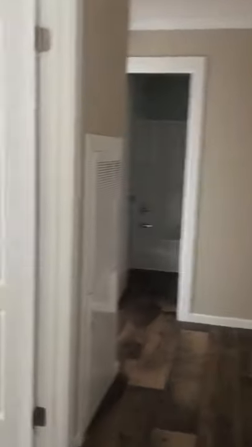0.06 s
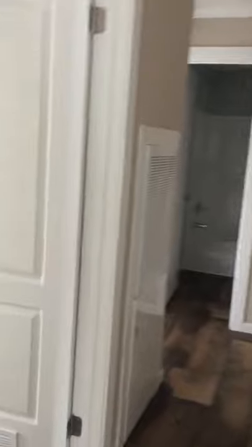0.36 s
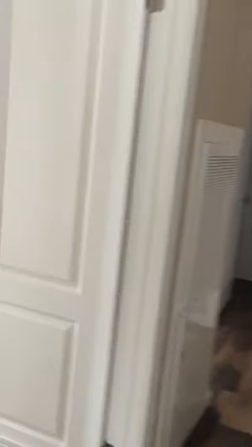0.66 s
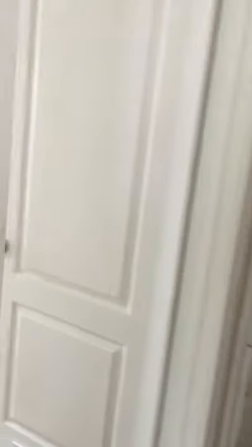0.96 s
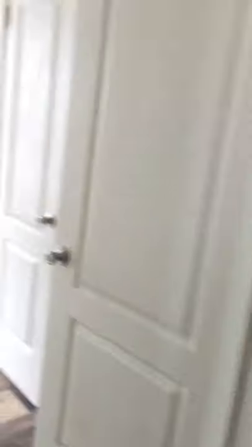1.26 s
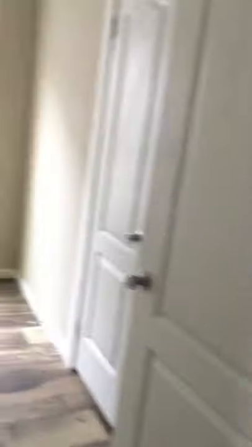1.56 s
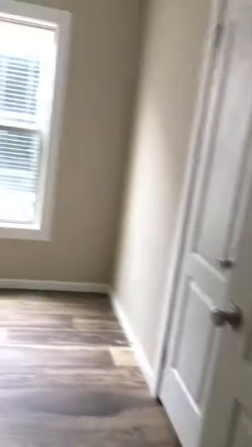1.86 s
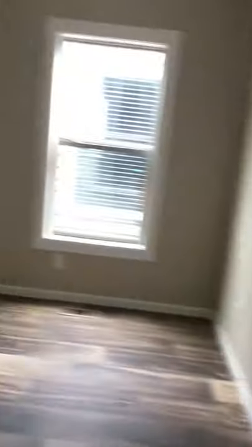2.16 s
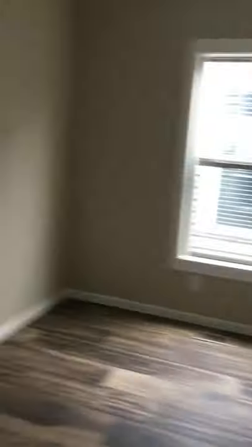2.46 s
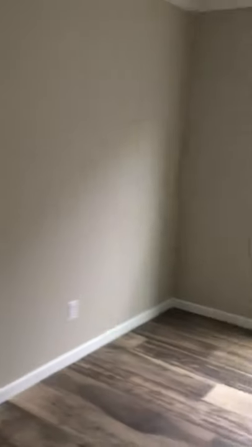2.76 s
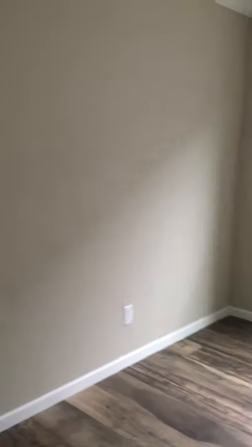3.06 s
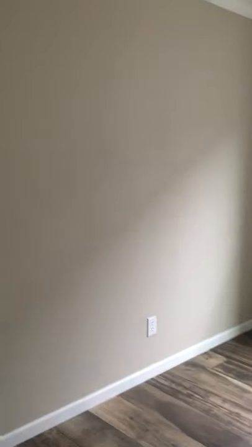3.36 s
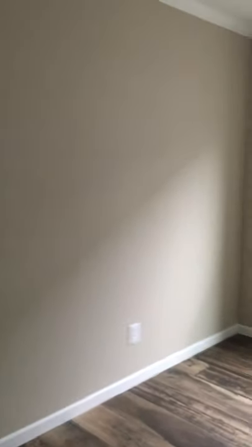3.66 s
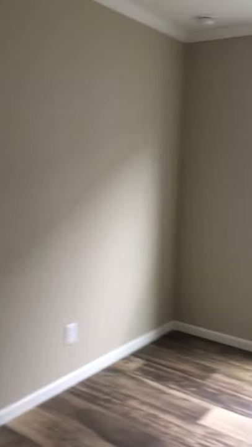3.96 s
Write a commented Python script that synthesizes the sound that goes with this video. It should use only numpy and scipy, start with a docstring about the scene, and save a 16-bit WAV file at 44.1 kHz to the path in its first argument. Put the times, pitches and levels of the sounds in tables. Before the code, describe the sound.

Soft footsteps thump and scuff on a hollow floor as someone walks into a bare room, clothes rustling near the microphone. A fan hums and blows, then fades behind. The steps stop, leaving a low rumble and thin hiss.

```python
"""A fan hums and blows as someone walks from a hallway into a bare room of an empty house.
Soft steps excite the modes of a hollow floor, soles scuff and clothes rustle by friction,
and the bare walls reverberate. The fan falls behind and the walker stops,
leaving a low rumble and a thin hiss."""
import sys
import numpy as np
from scipy import signal
from scipy.fft import rfft, irfft
from scipy.io import wavfile

SR = 44100
rng = np.random.default_rng(int(sys.argv[2]) if len(sys.argv) > 2 else 0)


def unload_audio(sound):
    """Save the sound as a 16-bit wav file, at the path given as the first command line argument."""
    columns = np.transpose(np.atleast_2d(sound))
    # keep every value between -1 and 1, then stretch to whole-number steps
    steps = np.round(np.clip(columns, -1, 1) * 32767)
    wavfile.write(sys.argv[1], SR, steps.astype(np.int16))


N = 176400
EVENT_SAMPLES = 32768
T, HZ = np.arange(N) / SR, np.fft.rfftfreq(N, 1 / SR)
SLIPS_HZ, SOLE_GRAIN_DB, CLOTH_GRAIN_DB = 300, 0.5, -1.5


def amp(db):
    """Amplitude ratio of a level in decibels."""
    return 10 ** (np.asarray(db) / 20)


def unit(x):
    """Normalisation to rms 1."""
    return x / np.sqrt(np.mean(x ** 2) + 1e-20)


def read(points, hz=HZ):
    """Interpolation of a table on a log-frequency axis."""
    f, value = np.transpose(points)
    return np.interp(np.log(hz + 1), np.log(f + 1), value)


def curve(points, column=1):
    """Linear interpolation of one column over time."""
    columns = np.transpose(points)
    return np.interp(T, columns[0], columns[column])


def bells(rows, at=HZ):
    """Lorentzian peaks or dips, in dB over frequency."""
    return sum(db / (1 + (2 * (at - hz) / width) ** 2) for hz, width, db in rows)


def drift(rate_hz, size=N):
    """Random modulation: low-pass noise of rms 1."""
    knots = np.arange(0, size + 20, 20)
    hz = np.fft.rfftfreq(len(knots), 20 / SR)
    spectrum = rfft(rng.standard_normal(len(knots))) * np.exp(-(hz / rate_hz) ** 2)
    return np.interp(np.arange(size), knots, unit(irfft(spectrum, len(knots))))


def noise(points, grain_db=0, resonances=(), size=N):
    """Source and filter: noise clumped into tiny slips by grain_db, then spectrally shaped; rms 1."""
    hz = np.fft.rfftfreq(size, 1 / SR)
    slips = rng.standard_normal(size) * amp(grain_db * drift(SLIPS_HZ, size))
    response = amp(read(points, hz) + bells(resonances, hz))
    return unit(irfft(rfft(slips) * response, size))


def stroke(rise, fall):
    """Linear attack, then exponential decay with time constant fall."""
    t = T[:EVENT_SAMPLES]
    return np.clip(t / rise, 0, 1) * np.exp(-np.maximum(t - rise, 0) / fall)


def add(mix, start, sound):
    """Superposition of a sound from start seconds on."""
    part = mix[max(round(start * SR), 0):][:len(sound)]
    part += sound[:len(part)]


# spectrum of the rumble and hiss (frequency [Hz], relative level [dB])
HOUSE_SPECTRUM = [(18, -31), (27, -26), (38, -10.5), (65, 0.5), (85, -8.5), (105, -6.5), (128, -43),
                  (165, -13.5), (205, -28.5), (270, -23.5), (480, -44), (850, -36.5), (1500, -53.5),
                  (3500, -63.5), (7000, -51.5), (15000, -55)]
def house(noise_db=-52, mains_hz=60.7, mains_db=-54):
    """Ambient noise: a steady broadband floor, and mains hum wavering in phase and amplitude."""
    phase = 2 * np.pi * (mains_hz * T + rng.random()) + 0.27 * drift(2.5)
    mains = np.sqrt(2) * np.sin(phase)
    return amp(noise_db) * noise(HOUSE_SPECTRUM) + amp(mains_db + 0.73 * drift(9.2)) * mains


# hum that sinks and fades (time [s], frequency [Hz], level [dB])
FAN_HUM = [(0, 96.7, -39.5), (.2, 98.7, -37), (.45, 99.5, -40.5), (.7, 101.9, -43), (1.1, 98.96, -47),
           (1.6, 96.84, -56), (2.1, 93, -50), (2.4, 87, -65), (2.7, 83, -52), (3.1, 82, -57), (4, 84, -54)]
# moving air at the listener (time [s], level [dB])
AIR_LEVEL = [(0, -46), (.8, -46), (1.5, -47.5), (2.0, -50), (2.6, -56), (3.1, -55.5), (4, -55)]
# spectrum of the air (frequency [Hz], relative level [dB])
AIR_SPECTRUM = [(18, -29), (28, -9), (42, 5.5), (70, 1), (125, -8), (200, -15), (300, -23), (550, -25.5),
                (1500, -30), (2500, -33.5), (6000, -38.5), (15000, -50.5)]
def fan(waver_db=1.0):
    """Attenuation with distance: a low tone and broadband flow noise fade as the fan falls behind."""
    cycles = np.cumsum(curve(FAN_HUM)) / SR + rng.random()
    hum_db = curve(FAN_HUM, column=2) + waver_db * drift(15.3)
    hum = amp(hum_db) * np.sqrt(2) * np.sin(2 * np.pi * cycles)
    return hum + amp(curve(AIR_LEVEL)) * noise(AIR_SPECTRUM)


def standing_waves(ripple_db=1.4, spacing_hz=37, corner_hz=900):
    """Interference between bare walls: narrow peaks and dips, in dB over frequency."""
    heights = rng.standard_normal(2000)
    ripple = np.interp(HZ / spacing_hz, np.arange(len(heights)), heights)
    return ripple_db * ripple * HZ ** 2 / (HZ ** 2 + corner_hz ** 2)


# reverberation of the bare room (frequency [Hz], 60 dB decay time [s])
ROOM_DECAY = [(100, 0.99), (400, 0.95), (1500, 0.42), (5000, 0.77), (15000, 0.1)]
def walls(x, onset_s=0.004):
    """Reverberation: convolution with random reflections, each band decaying at its own rate."""
    reflections = rng.standard_normal(SR) * (rng.random(SR) < .08)
    hz, t, bands = signal.stft(reflections, SR, nperseg=256)
    decay = amp(-60 * t / read(ROOM_DECAY, hz)[:, None])
    tail = signal.istft(bands * decay, SR, nperseg=256)[1]
    tail *= np.clip(np.arange(len(tail)) / SR / onset_s, 0, 1)
    return signal.fftconvolve(x, tail / np.linalg.norm(tail))[:N]


# rustle of the clothes (time [s], level [dB])
RUSTLE_LEVEL = [(0, -67), (.16, -60), (.39, -67.5), (.6, -54.5), (.8, -61), (.99, -62.5), (1.15, -58.5),
                (1.32, -54.5), (1.5, -61), (1.7, -59), (1.9, -55), (2.1, -64), (2.3, -64), (2.52, -59.5),
                (2.76, -59.5), (3.0, -67.5), (3.4, -85), (4.0, -72.5)]
# spectrum of rubbing fabric (frequency [Hz], relative level [dB])
CLOTH_SPECTRUM = [(100, -21), (300, 5), (600, 2), (1200, 4), (2000, 4.5), (4000, 1.5), (6500, -1.5),
                  (9000, -4.5), (12000, -10.5), (16000, -17)]
def clothes(flutter_db=0.5):
    """Friction noise: fabric rubs as the walker moves, and settles at the end."""
    level_db = curve(RUSTLE_LEVEL) + flutter_db * drift(25)
    return amp(level_db) * noise(CLOTH_SPECTRUM, CLOTH_GRAIN_DB)


# swishing fabric (time [s], rise [s], fall [s], level [dB], centre [Hz], half-width [octaves])
FABRIC_SWISHES = [(0.14, .006, 0.016, -73, 6500, 0.76), (0.5, .05, 0.093, -62, 4500, 0.92),
                  (0.998, 0.023, 0.077, -56, 11640, 0.77), (0.833, 0.016, 0.073, -57.5, 4300, 0.8),
                  (1.26, 0.046, 0.029, -67, 7000, 1.0), (1.765, 0.045, 0.019, -56.5, 8800, 0.74),
                  (2.335, 0.035, 0.082, -61.5, 8500, 0.56), (2.59, 0.11, 0.084, -64.5, 6100, 0.56)]
# sliding soles (time [s], rise [s], fall [s], level [dB], centre [Hz], half-width [octaves])
SOLE_SCUFFS = [(0.432, 0.0068, .06, -57, 1870, 0.24), (0.465, .025, 0.11, -54.5, 1100, 1.13),
               (0.485, .035, 0.021, -52.5, 1020, 0.094), (0.831, 0.021, 0.034, -48.5, 1450, 0.77),
               (0.836, 0.023, 0.025, -52, 480, 0.63), (1.0, 0.037, 0.028, -52, 480, .8),
               (1.25, 0.03, 0.18, -56, 400, 1.9), (1.68, 0.04, .2, -64, 339.9, 0.8),
               (2.32, 0.064, 0.063, -53.5, 2990, 0.63), (2.33, 0.07, 0.05, -55, 328.3, 0.66),
               (2.35, 0.044, 0.15, -53.5, 880, 0.54), (2.48, 0.032, 0.15, -63, 1960, .6)]
# floorboard resonances, for scuffs and knocks (frequency [Hz], bandwidth [Hz], gain [dB])
BOARD_RESONANCES = [(359.2, 27.5, 16.5), (393, 18, 18), (593, 34, 8), (1044, 28, 6.5), (1470, 51, 4),
                    (1870, 92, 1.5), (2285, 100, 1.5)]
def rubs():
    """Sliding friction: each stroke is a burst of band noise; under a sole the boards resonate."""
    out = np.zeros(N)
    offset = np.linspace(-10, 10, 41)  # half-widths from the band centre
    band_db = -20 * np.log10(1 + .5 * offset ** 2 + 0.18 * offset ** 4)
    contacts = (SOLE_SCUFFS, SOLE_GRAIN_DB, BOARD_RESONANCES), (FABRIC_SWISHES, CLOTH_GRAIN_DB, ())
    for strokes, grain_db, resonances in contacts:
        for start, rise, fall, db, hz, octaves in strokes:
            band = np.column_stack([hz * 2 ** (offset * octaves), band_db])
            friction = noise(band, grain_db, resonances, EVENT_SAMPLES)
            add(out, start, amp(db) * stroke(rise, fall) * friction)
    return out


# modes of the hollow floor (frequency [Hz], relative level [dB], 60 dB decay time [s])
FLOOR_MODES = [(147.2, -2.5, 0.16), (180.5, -2.5, .22), (213, -3.5, 0.2), (360.8, -12, 0.21),
               (391.6, -15, .2)]
# spectrum of a sole's knock (frequency [Hz], relative level [dB])
KNOCK_SPECTRUM = [(100, -2), (350, -13.5), (700, -3), (1100, -3), (1500, -6.5), (2000, -9), (2800, -20),
                  (5000, -32), (15000, -60)]
# footfalls (time [s], thud level [dB], knock level [dB], settling time of the sole [s])
FOOTFALLS = [(0.4304, -38, -48.5, 0.005), (0.683, -43.5, -62, 0.0086), (1.089, -38, -48, 0.016),
             (1.122, -40, -44.5, 0.0054), (1.163, -46, -72, 0.0032), (1.322, -47, -53, 0.0032),
             (1.725, -42, -54.5, 0.013), (1.971, -47.5, -71, .012), (2.396, -43, -57, 0.005)]
def steps(mode_spread=0.037, knock_fall_s=.015):
    """Impact excitation: each footfall rings the floor's damped modes and knocks on the boards."""
    thud, knock_envelope = np.zeros((2, N))
    t = T[:EVENT_SAMPLES]
    for start, thud_db, knock_db, settle in FOOTFALLS:
        detune = 1 + mode_spread * rng.uniform(-1.26, 1, len(FLOOR_MODES))  # each spot has its own pitch
        ring = sum(amp(db - 60 * t / t60) * np.sin(2 * np.pi * hz * ratio * t)
                   for (hz, db, t60), ratio in zip(FLOOR_MODES, detune))
        add(thud, start, amp(thud_db) * np.clip(t / settle, 0, 1) * ring)
        add(knock_envelope, start, amp(knock_db) * stroke(settle, knock_fall_s))
    return thud + knock_envelope * noise(KNOCK_SPECTRUM, SOLE_GRAIN_DB, BOARD_RESONANCES)


def scene(step_echo_db=-4.5, rub_echo_db=-13):
    """Superposition of direct sound, reverberation and background, coloured by standing waves."""
    feet, friction = steps(), rubs()
    echo = walls(amp(step_echo_db) * feet + amp(rub_echo_db) * friction)
    mix = feet + friction + echo + clothes() + fan() + house()
    return irfft(rfft(mix) * amp(standing_waves()), N)[None]


# dips in the microphone's response (frequency [Hz], bandwidth [Hz], gain [dB])
RESPONSE_DIPS = [(2700, 720, -4.5), (4890, 500, -4), (7600, 1050, -2.5), (10450, 800, -5)]
def record(dry, cutoff_hz=15750):
    """Linear filtering: the microphone's frequency response, then a band limit."""
    coloured = irfft(rfft(dry) * amp(bells(RESPONSE_DIPS)), N)
    lowpass = signal.firwin(801, cutoff_hz, window=("kaiser", 9), fs=SR)
    return signal.oaconvolve(coloured, lowpass[None], "same")


dry = scene()
out = record(dry)
unload_audio(out)
```